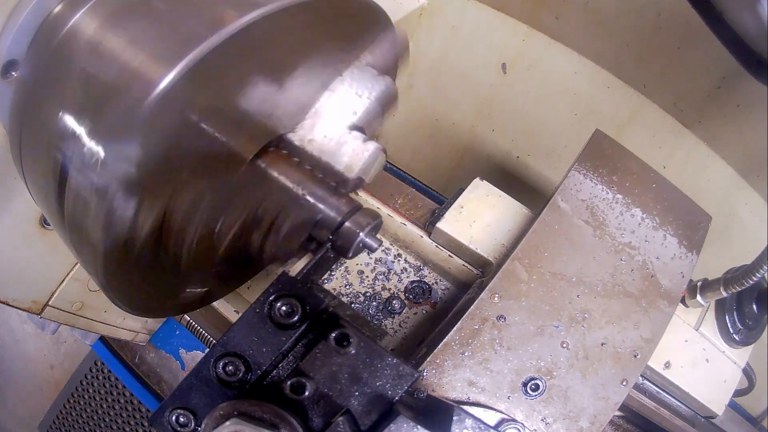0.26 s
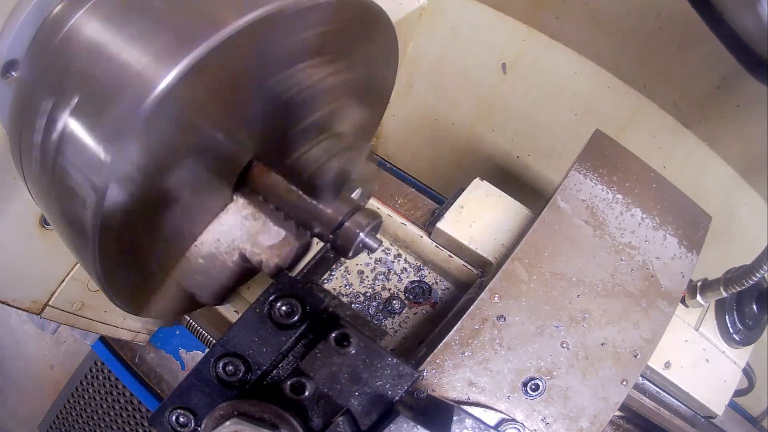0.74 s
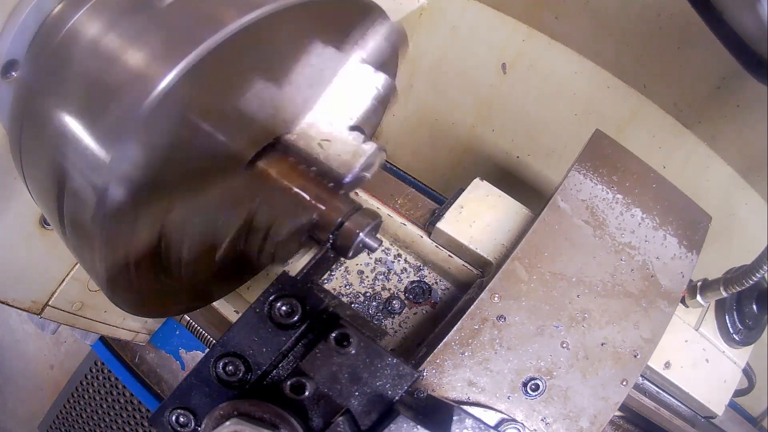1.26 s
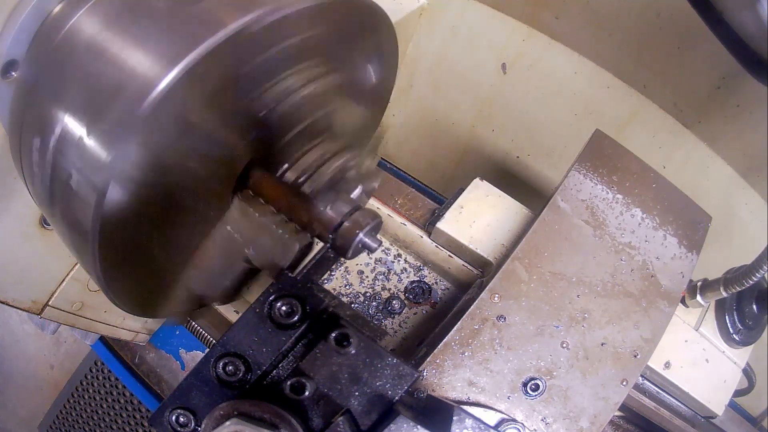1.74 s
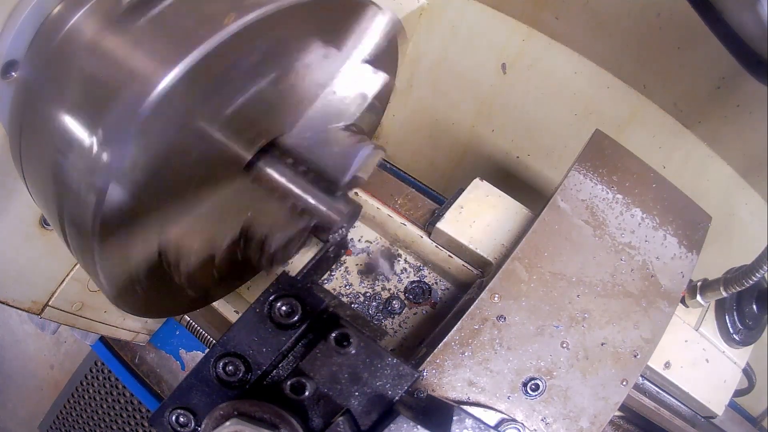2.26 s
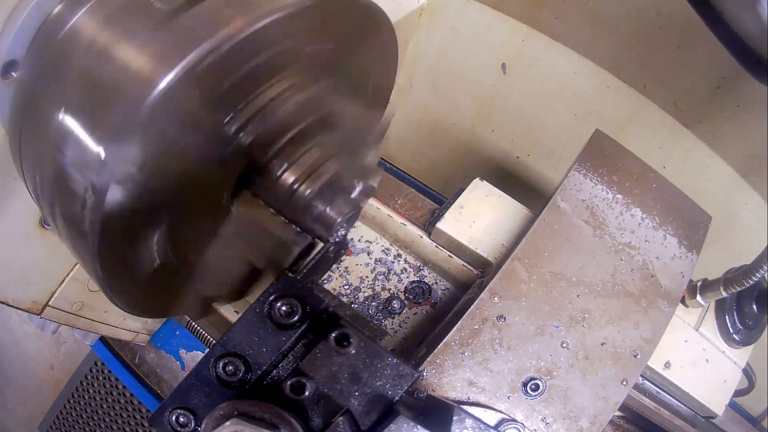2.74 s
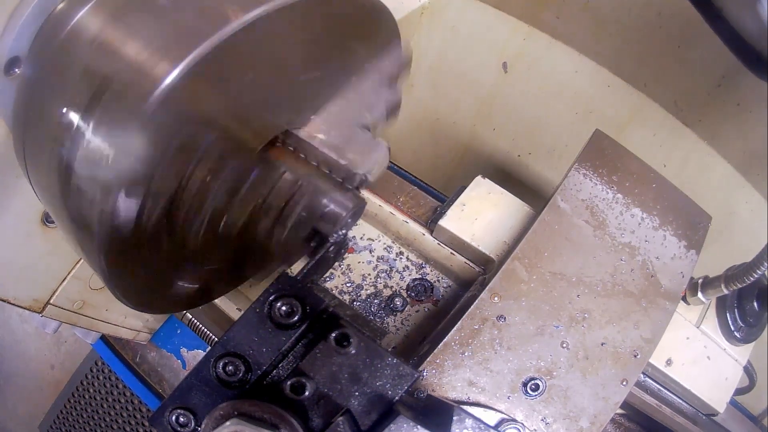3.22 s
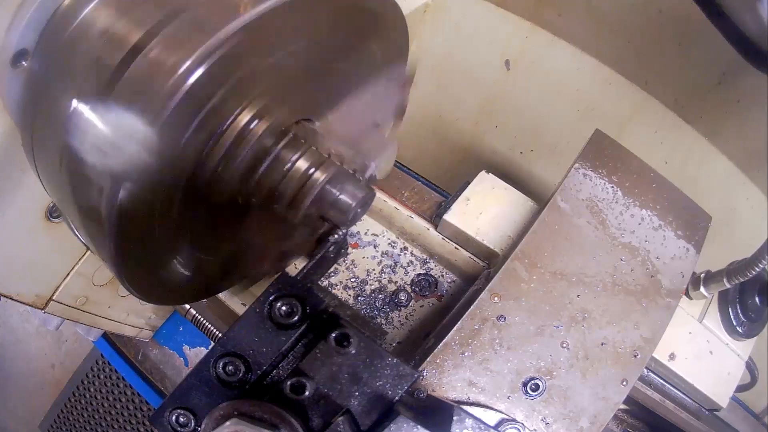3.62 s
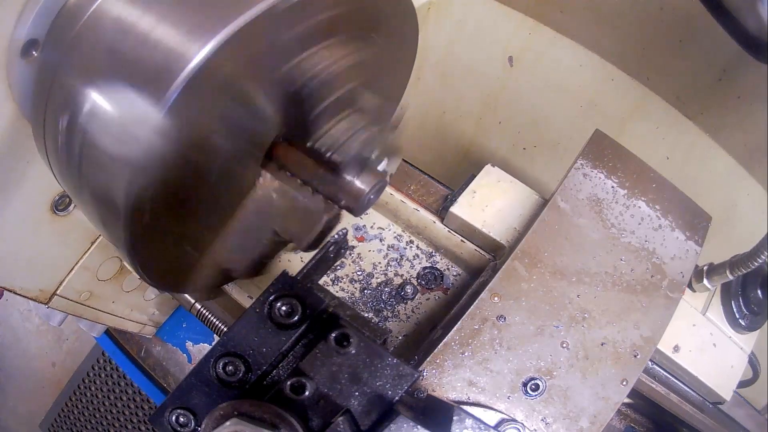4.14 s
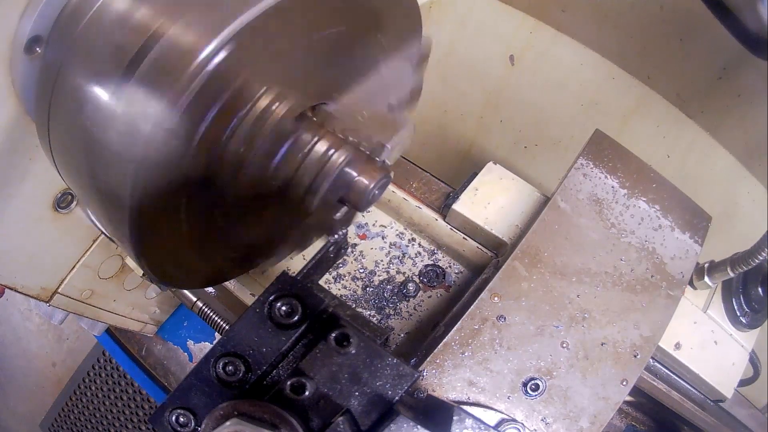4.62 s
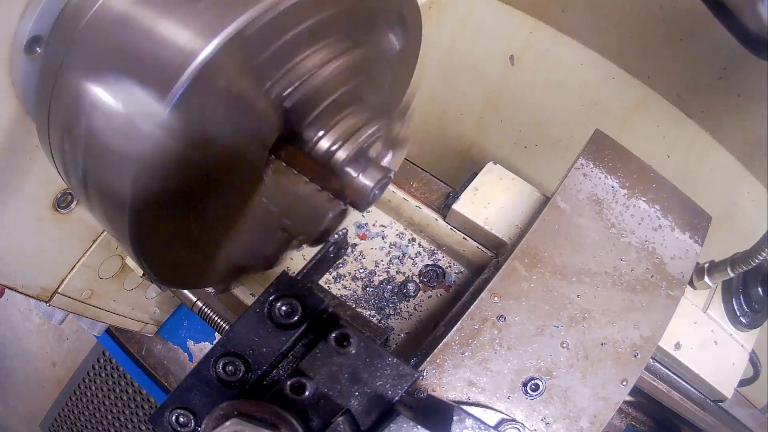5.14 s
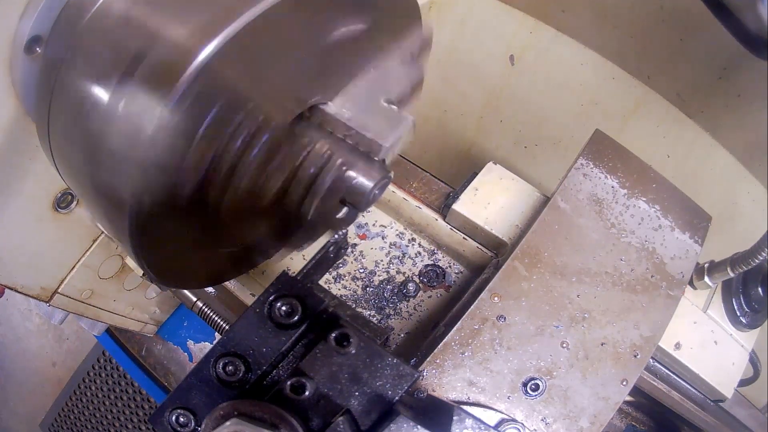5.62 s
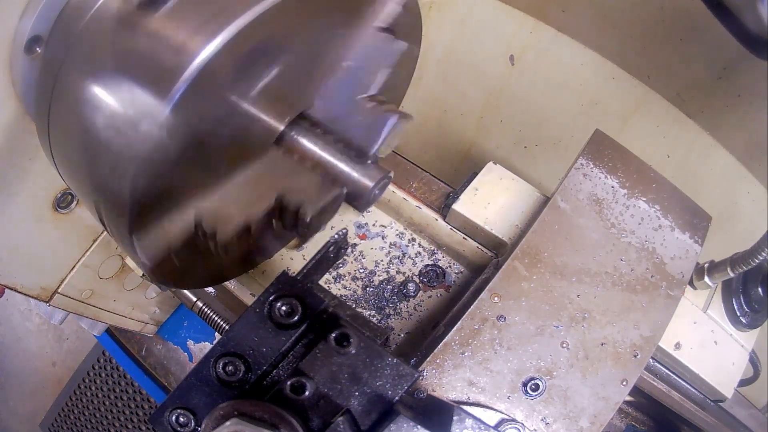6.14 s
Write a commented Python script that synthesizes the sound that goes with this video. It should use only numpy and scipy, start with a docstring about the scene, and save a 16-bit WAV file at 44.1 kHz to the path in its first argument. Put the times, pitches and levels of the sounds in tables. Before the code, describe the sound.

A metal lathe is already running at the start, heard close to its spinning chuck and only on the left side. A steady, slightly fluttering high whine sits above a low shuddering hum and a broad churn of gears and bearings. Around 2 seconds the hum grows a little heavier, and at about 2.3 seconds a metal chip ticks lightly on steel and bounces. From about 3 to 4.3 seconds the hum thins and the whine eases slightly, then both come back. The hum stumbles briefly near 5.5 seconds. At about 5.8 seconds the machine is switched off: the whine and hum stop dead with a light metallic knock. The churn turns duller and fainter as the spindle coasts, and at about 6.3 seconds there is a steel clack with a low thump.

```python
"""A metal lathe, heard close to its spinning chuck, on the left channel only.
Its feed motor whines over the hum of a shuddering drive, which also modulates the whine.
Rolling gears and bearings excite the resonances of the headstock in a broadband churn.
A chip ticks on steel and bounces; later the feed stops dead with a knock, the churn
dulls as the spindle coasts, and a clack follows."""
import sys
import numpy as np
from scipy import signal
from scipy.fft import rfft, irfft
from scipy.io import wavfile

SR = 44100
rng = np.random.default_rng(int(sys.argv[2]) if len(sys.argv) > 2 else 0)


def pcm_store(signal):
    """Save signal as 16-bit PCM."""
    levels = np.round(np.clip(np.atleast_2d(signal), -1, 1) * 32767)
    wavfile.write(sys.argv[1], SR, levels.astype(np.int16).T)


N = 281358
TIME = np.arange(N) / SR
STOP_S = 5.785  # the feed is switched off


def gain_of(db):
    """Amplitude ratio of a level in decibels."""
    return 10 ** (np.asarray(db) / 20)


def unit_rms(x):
    """Normalisation to rms 1."""
    return x / np.sqrt(np.mean(x ** 2) + 1e-20)


def spectrum_at(table, hz):
    """Interpolation of each column on a log-frequency axis."""
    f, *columns = np.transpose(table)
    return [np.interp(np.log(hz + 1), np.log(f + 1), c) for c in columns]


def wander(hz):
    """Low-pass noise: random motion of rms 1, mostly slower than hz."""
    f = np.fft.rfftfreq(N, 1 / SR)
    return unit_rms(irfft(rfft(rng.standard_normal(N)) / (1 + (f / hz) ** 2) ** 2, N))


def ramp(start_s, length_s):
    """Linear rise from 0 to 1."""
    return np.clip((TIME - start_s) / length_s, 0, 1)


# The shudder loses its step: (time [s], half-width [s], extra frequency deviation [Hz])
SLIP_BURSTS = [(2.38, .13, 12), (5.48, .15, 32)]

def drive_shudder(rate_hz=99.12, slip_hz=9.5, heavy_slip_hz=3):
    """Frequency modulation: the drive's cycle keeps slipping. Returns its phase and two-tone hum."""
    heavy = ramp(1.85, 0.58)  # the shudder turns heavy
    lull = ramp(2.74, 0.32) - ramp(4.3, 0.12)  # the octave drops away, then snaps back
    stumbles_hz = sum(hz * np.exp(-((TIME - s) / half) ** 2) for s, half, hz in SLIP_BURSTS)
    deviation_hz = slip_hz + heavy_slip_hz * heavy + stumbles_hz
    jerks = wander(121.1) * wander(24.94)  # mostly small, with sudden peaks
    phase = 2 * np.pi * np.cumsum(rate_hz + deviation_hz * jerks) / SR
    fundamental = gain_of(-40 + 5.6 * heavy + 0.7 * lull) * (1 + 0.088 * wander(66)) * np.cos(phase)
    octave = gain_of(-32.5 - 0.6 * heavy - 12 * lull) * (1 + 0.27 * wander(130)) * np.cos(2 * phase)
    inertia = signal.butter(8, 240, fs=SR, output="sos")  # the heavy slide cannot follow fast jerks
    hum = signal.sosfilt(inertia, fundamental + octave)
    ring_down = np.exp(-np.maximum(TIME - STOP_S, 0) / 0.028)  # the slide shakes on for a few cycles
    return phase, np.sqrt(2) * hum * ring_down


# Envelope of the motor's whine: (time [s], relative level [dB])
WHINE_ENVELOPE = [(0, -26.4), (1.3, -26), (2.4, -27.2), (3.1, -29), (4.25, -29), (5.0, -25.5), (5.33, -27),
                  (5.76, -25.5)]
# Tones beside the whine: (offset [multiples of the shudder rate], level re the whine [dB])
WHINE_SIDEBANDS = [(-2, -19), (-1, -17.5), (1, -33)]

def feed_motor(shudder_phase, pitch_hz=945.5, overtone_db=-33, brake_s=0.025):
    """Modulation sidebands: the shudder roughens the motor's tone with partials on either side."""
    frequency_hz = pitch_hz + 1.11 * wander(18) + 3.49 * wander(110)  # drift and flutter
    phase = np.pi / 2 + 2 * np.pi * np.cumsum(frequency_hz) / SR
    phase += 0.26 * wander(17)  # the rotor hunts about its set speed
    whine = (1 + 0.085 * wander(240)) * np.cos(phase) + gain_of(overtone_db) * np.cos(2 * phase)
    for multiple, db in WHINE_SIDEBANDS:
        whine += gain_of(db) * np.cos(phase + round(multiple) * shudder_phase)
    level_db = np.interp(TIME, *np.transpose(WHINE_ENVELOPE)) + 0.52
    running = 1 - ramp(STOP_S, brake_s)
    return np.sqrt(2) * gain_of(level_db) * whine * running


# Rolling noise at full speed: (frequency [Hz], relative spectral density [dB])
ROLLING_SPECTRUM = [(20, -67.5), (70, -61), (150, -55.5), (270, -65), (370, -69), (680, -68), (880, -61),
                    (1200, -64.5), (1500, -66.5), (1900, -73.5), (2400, -77.5), (3000, -84.5), (4300, -88),
                    (5800, -107), (9000, -118)]
# Resonances of the headstock and chuck: (frequency [Hz], width [Hz], lift [dB])
CASTING_MODES = [(499, 37, 4.5), (1067, 82, 2), (1375, 160, 4.5), (2760, 75, 1.5), (3426, 323, 13),
                 (3880, 316, 11.5), (6650, 550, 8.5), (7350, 400, 7.5), (8800, 400, 6)]
# Attenuation as the spindle coasts: (frequency [Hz], loss at the stop [dB], decay rate [dB/s])
COASTING_LOSS = [(30, 3, -5), (110, 14, 15), (298, 3.5, 0), (520, 2.5, 6.5), (950, 1.5, 12),
                 (1190, 1.5, 19), (1430, 0.5, 5.5), (1650, 2.5, 17), (2100, -2, 22), (3450, 0.5, 26),
                 (3880, 2.5, 24), (7000, -0.5, 20)]

def headstock(rattle_db=0.83, ripple_db=1.16, ripple_hz=100.4, drop_s=0.14):
    """Forced vibration: gears and bearings ring the casting, duller and fainter as the spindle coasts."""
    torque_ripple = np.sin(2 * np.pi * ripple_hz * TIME) * (TIME < STOP_S)
    load_db = rattle_db * wander(160) + ripple_db * torque_ripple
    contact = unit_rms(rng.standard_normal(N) * gain_of(load_db)) * np.sqrt(SR / 2)
    hz, t, spectra = signal.stft(contact, SR, nperseg=2048, noverlap=1536)
    resonance_db = sum(db * np.exp(-2 * ((hz - f) / width) ** 2) for f, width, db in CASTING_MODES)
    colour_db = spectrum_at(ROLLING_SPECTRUM, hz)[0] + resonance_db
    drop_db, fade_db_per_s = spectrum_at(COASTING_LOSS, hz)
    coast_s = np.maximum(t - STOP_S, 0)
    loss_db = np.outer(drop_db, np.minimum(coast_s / drop_s, 1)) + np.outer(fade_db_per_s, coast_s)
    spectra *= gain_of(colour_db[:, None] - loss_db)
    return signal.istft(spectra, SR, nperseg=2048, noverlap=1536)[1][:N]


def microphone_hiss():
    """Self-noise: a white floor, with equal power in every hertz."""
    return gain_of(-113.5) * np.sqrt(SR / 2) * rng.standard_normal(N)


# Spectrum of struck steel: (frequency [Hz], relative level [dB])
STEEL_SPECTRUM = [(300, -8), (1300, -7), (2000, 4.5), (2700, -4.5), (3900, -3), (5200, -13), (6800, -12.5),
                  (8200, -20.5), (9200, -18.5), (10500, -26), (12800, -32), (14000, -45)]
# Ticks and clacks, at relative levels:
# (time [s], ring level [dB], ring T60 [s], tilt above 2 kHz [dB/octave], thump [dB], ping [dB])
IMPACTS = [(2.262, -26.5, 0.024, 0.5, -80, -50), (2.266, -41, 0.084, 1, -84, -55),
           (2.341, -50, .06, -4, -80, -37), (2.346, -40, 0.045, -4, -79, -36.5),
           (5.776, -33, 0.12, -9, -63, -70), (6.344, -33.5, .04, -5.5, -70, -40),
           (6.351, -33, 0.12, -7, -30.5, -50)]

def steel_impact(ring_db, ring_t60, tilt_db, thump_db, ping_db, thump_hz=160.2, ping_hz=4360):
    """Damped free vibration: a blow excites dense steel modes, the bed's low mode and a clear ping."""
    t = TIME[:SR // 2]
    hz = np.fft.rfftfreq(len(t), 1 / SR)

    def decay(t60):
        return np.exp(-np.log(1000) * t / t60)

    colour = gain_of(spectrum_at(STEEL_SPECTRUM, hz)[0] + tilt_db * np.log2(np.maximum(hz / 2000, 1)))
    ring = unit_rms(irfft(rfft(rng.standard_normal(len(t))) * colour, len(t)))
    ring *= decay(ring_t60) * (1 - np.exp(-t / 0.00051))
    thump = np.sin(2 * np.pi * thump_hz * t) * decay(t60=0.25)
    ping = wander(260)[:len(t)] * np.sin(2 * np.pi * ping_hz * t)  # close modes of a small steel piece
    ping *= decay(t60=0.071) * (1 - np.exp(-t / 0.0046))
    return gain_of(ring_db) * ring + gain_of(thump_db) * thump + gain_of(ping_db) * ping


def scene():
    """Superposition: all sources sum at one microphone, which feeds the left channel."""
    shudder_phase, hum = drive_shudder()
    mix = hum + feed_motor(shudder_phase) + headstock() + microphone_hiss()
    for start_s, *blow in IMPACTS:
        start = round(start_s * SR)
        impact = steel_impact(*blow)[:N - start]
        mix[start:start + len(impact)] += impact
    return np.array([2 * mix, np.zeros(N)])


def record(dry, cutoff_hz=15250, dc_offset=0.1178):
    """Band limiting by a low-pass filter, with a constant offset on the left channel."""
    lowpass = signal.firwin(511, cutoff_hz, window=("kaiser", 9), fs=SR)
    return signal.oaconvolve(dry, lowpass[None], "same") + np.array([[dc_offset], [0]])


dry = scene()
out = record(dry)
pcm_store(out)
```